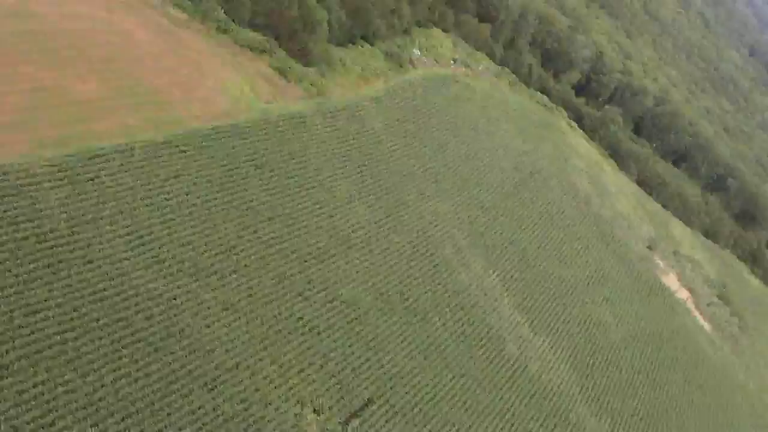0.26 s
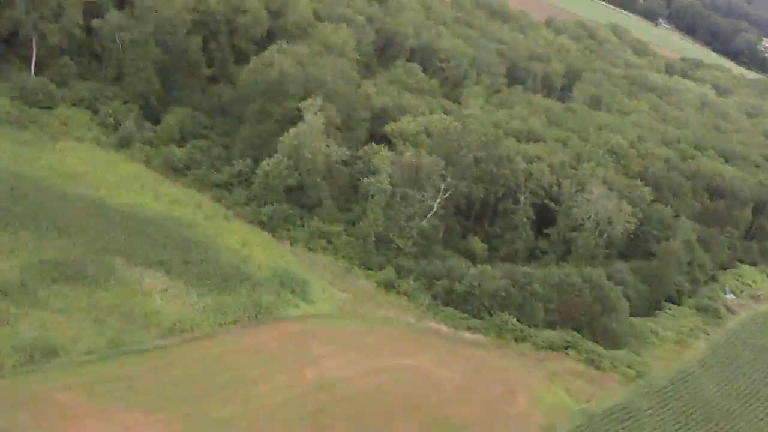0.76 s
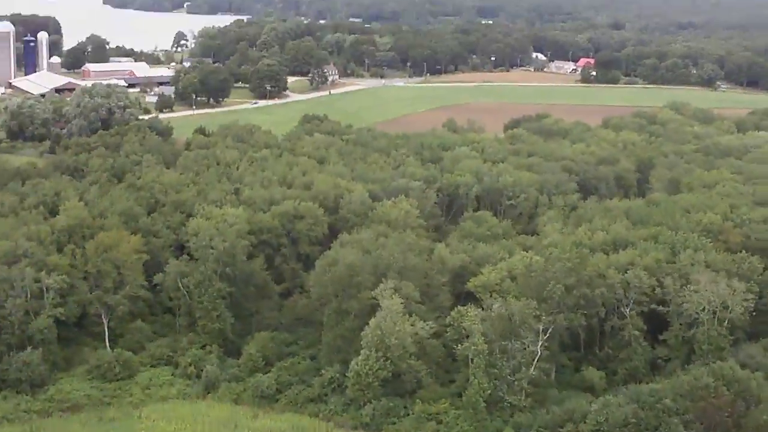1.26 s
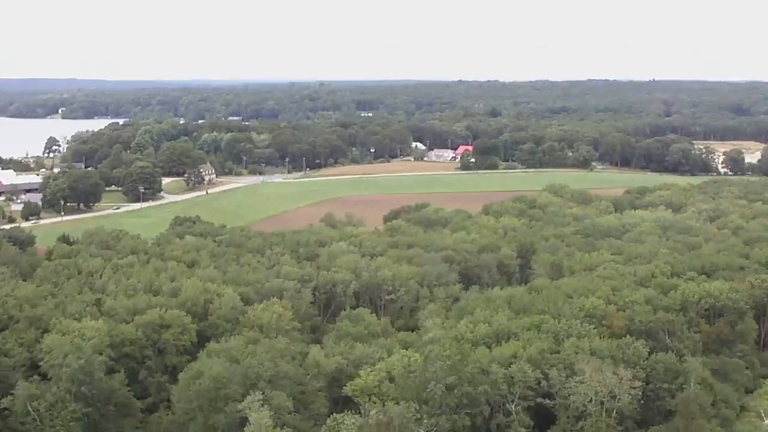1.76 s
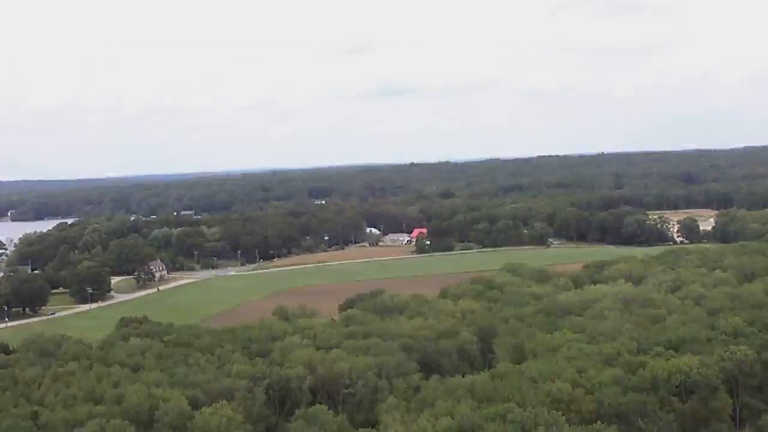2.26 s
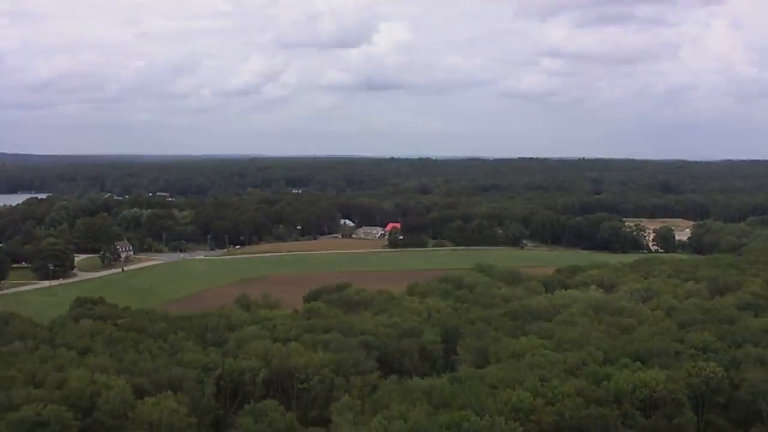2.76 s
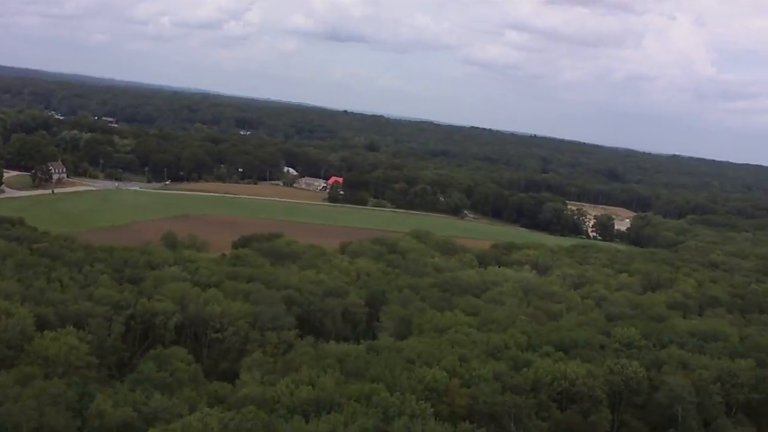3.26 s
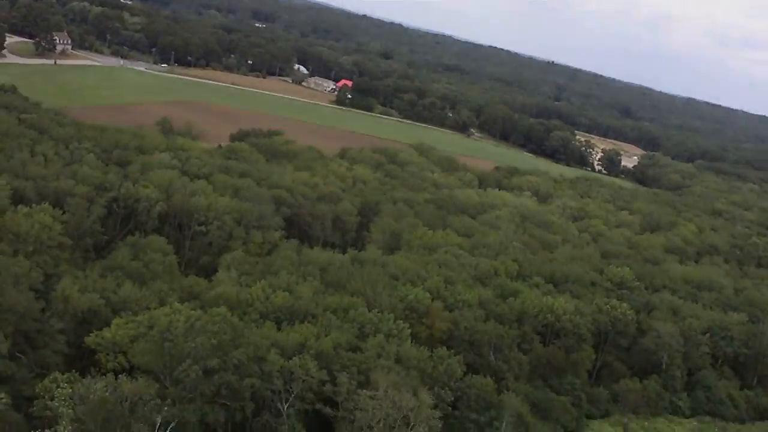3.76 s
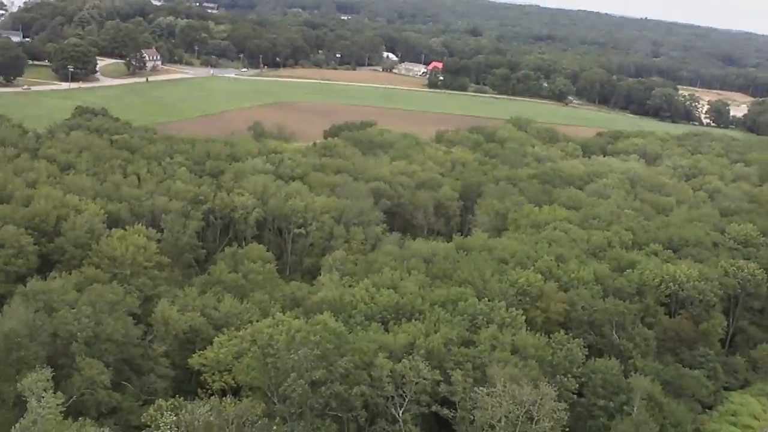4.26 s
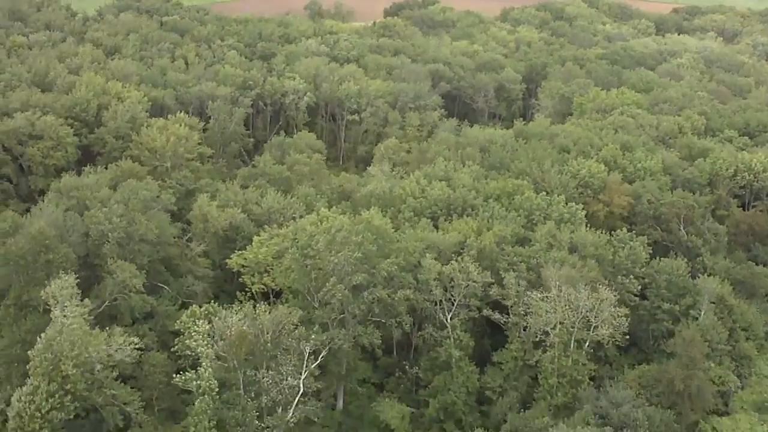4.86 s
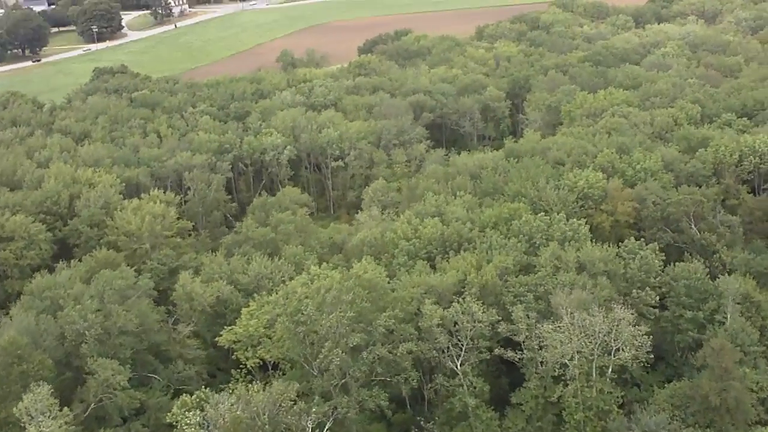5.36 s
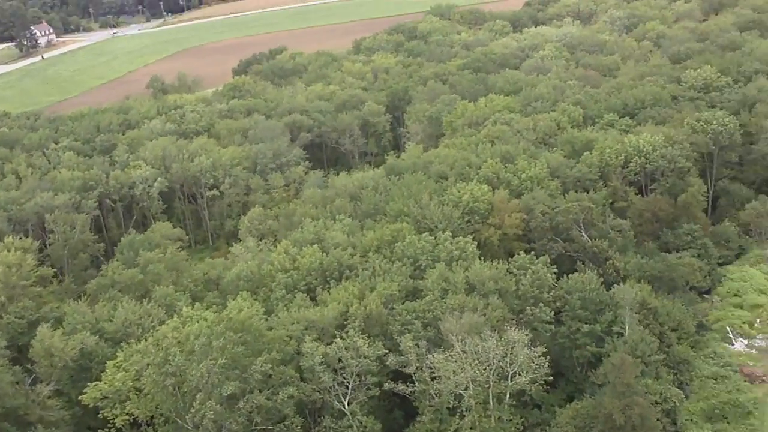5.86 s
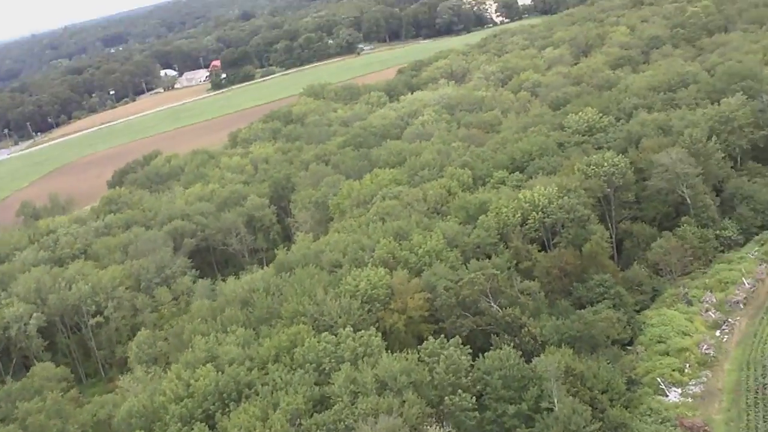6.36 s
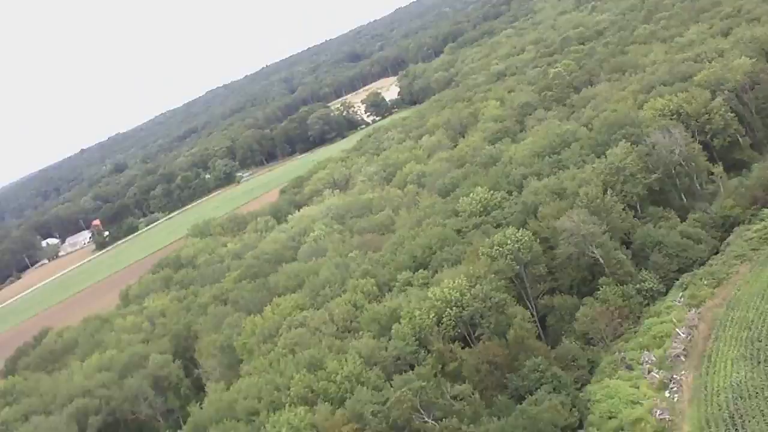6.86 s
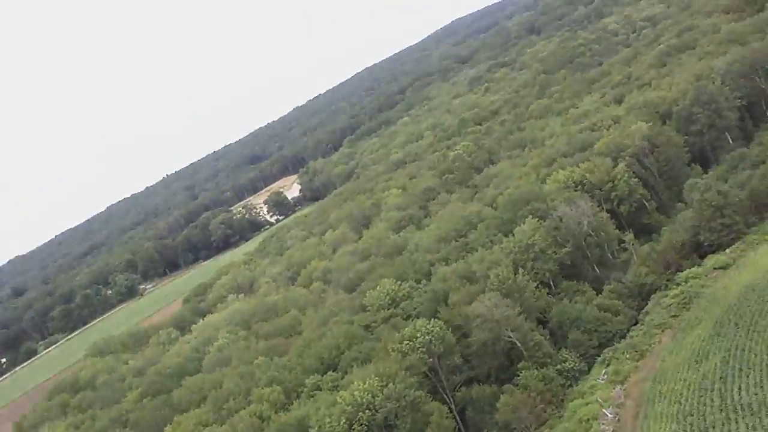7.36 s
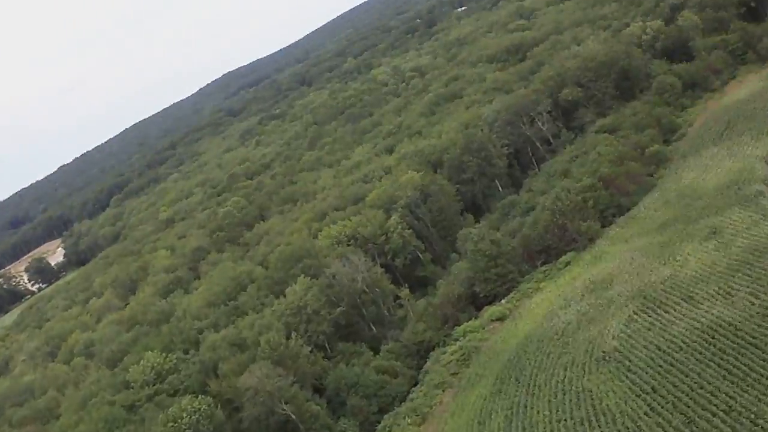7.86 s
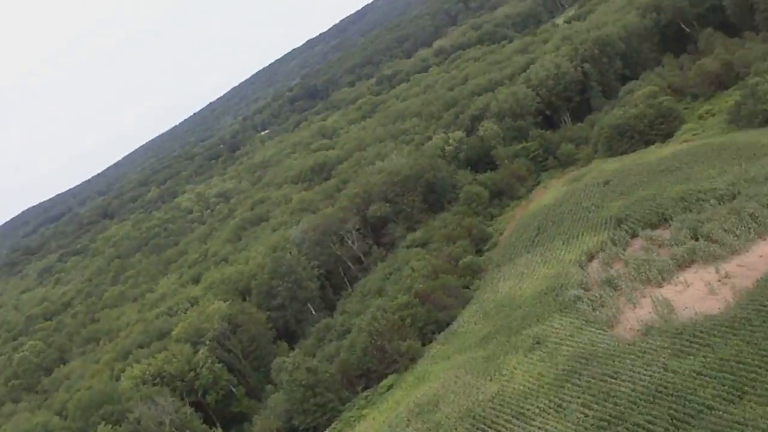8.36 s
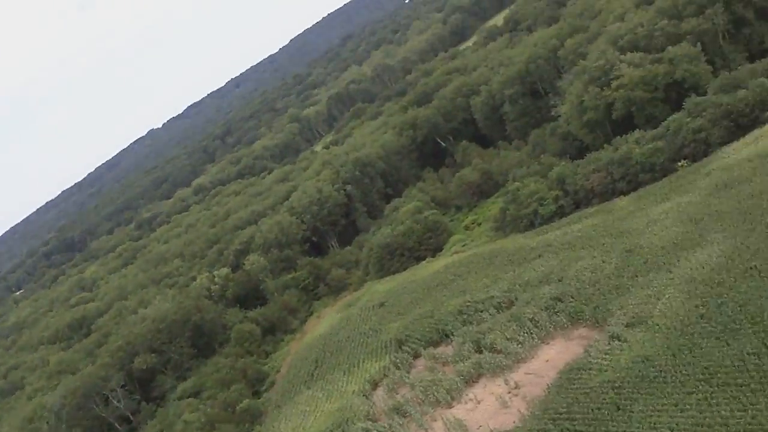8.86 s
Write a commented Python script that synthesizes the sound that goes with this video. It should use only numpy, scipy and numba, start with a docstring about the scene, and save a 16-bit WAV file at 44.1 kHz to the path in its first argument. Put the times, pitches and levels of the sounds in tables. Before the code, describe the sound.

The sound comes from a small microphone mounted on a model airplane flying over fields and woods. From the start, propeller wash hits it as a fast, irregular, low thumping flutter, mixed with rushing wind and scattered harder knocks that spit and overload. The buffeting is strongest and most rumbling around 1.2 to 1.4 seconds, then slows, dulls and is gone by 2 seconds.

From there only the airstream remains, a broad, slightly gusty roar with a hollow tone and a fluttering hiss on top. From about 3 seconds it softens and loses its hiss as the plane glides, reaching its quietest between 4 and 4.6 seconds. It then swells and brightens gradually, and is still rushing at the end, around 9 seconds.

```python
"""A small camera rides on a model airplane over fields. For the first two seconds uneven propeller wash
thumps the microphone about a hundred times a second, stirs up the airstream and overloads the input.
The motor stops and the plane glides: only the airstream is left, roaring in the microphone port.
It fades as the plane slows, then swells from about 4.6 s as the plane banks down."""
import sys
import numpy as np
from scipy import signal
from scipy.fft import rfft, irfft, next_fast_len
from scipy.io import wavfile
from scipy.ndimage import uniform_filter1d
from numba import njit

SR = 44100
rng = np.random.default_rng(int(sys.argv[2]) if len(sys.argv) > 2 else 0)


def int16_out(signal):
    """Quantize to a 16-bit WAV file."""
    q = np.round(np.clip(np.atleast_2d(signal).T, -1, 1) * 32767)
    wavfile.write(sys.argv[1], SR, q.astype(np.int16))


N = 402191


def undb(db):
    return 10 ** (np.asarray(db) / 20)


def curves(table):
    """Columns after t/s, interpolated per sample."""
    times_s, *columns = np.transpose(table)
    return [np.interp(np.arange(N) / SR, times_s, column) for column in columns]


def walk(rate_hz):
    """Random steps, smoothed twice; rms 1."""
    hold = int(SR / rate_hz)
    steps = np.repeat(rng.standard_normal(N // hold + 1), hold)
    smooth = uniform_filter1d(uniform_filter1d(steps, hold), hold)[:N]
    return smooth / np.sqrt(np.mean(smooth ** 2))


def ring(x, hz, width_hz):
    """Two-pole resonance; impulse response peaks near 1."""
    radius, angle = np.exp(-np.pi * width_hz / SR), 2 * np.pi * hz / SR
    return signal.lfilter([np.sin(angle)], [1, -2 * radius * np.cos(angle), radius ** 2], x)


@njit
def pulses(rate_hz, rate_factors, sizes):
    """One pulse per phase wrap; each cycle has its own rate factor and size."""
    out, phase, cycle = np.zeros(len(rate_hz)), 0., 0
    for i in range(len(rate_hz)):
        phase += rate_hz[i] * rate_factors[cycle] / SR
        if phase >= 1:
            phase, cycle = phase - 1, cycle + 1
            out[i] = sizes[cycle]
    return out


# Airframe modes: f/Hz, width/Hz, level/dB
AIRFRAME_MODES = [(113, 77, -2), (260, 350, 2), (407, 91, -9.5)]


def thump(blows, upper_lift_db):
    """Each blow rings the airframe; the microphone rolls off the bass."""
    lowest, *upper = [undb(db) * ring(blows, hz, width_hz) for hz, width_hz, db in AIRFRAME_MODES]
    rung = lowest + undb(upper_lift_db) * sum(upper)
    return signal.sosfilt(signal.butter(2, 80, "high", fs=SR, output="sos"), rung)


# Propeller wash before the motor fade: t/s, thump rate/Hz, level/dB
WASH_TRACK = [(0.0, 129.6, -18.5), (0.2, 116.4, -15.5), (0.41, 112, -17), (0.53, 118.1, -24.5),
              (0.7, 106, -21), (0.9, 118, -15.5), (1.2, 108.1, -6.5), (1.3, 125, -11), (1.37, 140.2, -7.5),
              (1.55, 110, -16), (1.7, 83.9, -15), (1.83, 85.9, -20), (2.0, 82, -19)]
MOTOR_STOP_S, SUCTION_LEAD_S = WASH_TRACK[-1][0], 0.00217


def propeller_wash():
    """One thump per vortex hitting the port; its low-pressure core arrives just ahead of its push."""
    rate_hz, level_db = curves(WASH_TRACK)
    rate_jitter, size_jitter = rng.standard_normal((N // 100, 2)).T
    pushes = pulses(rate_hz, np.exp(0.24 * rate_jitter), undb(5.4 * size_jitter))
    suction = 0.5 * np.roll(pushes, -int(SUCTION_LEAD_S * SR))
    upper_lift_db = 4 - 4 * np.arange(N) / SR  # duller as the motor winds down
    drone = thump(pushes - suction, upper_lift_db)
    drone /= np.std(drone[:int(MOTOR_STOP_S * SR)])
    return drone * undb(level_db) * motor_running()


def motor_running(fade_s=0.21):
    """1 while the motor turns, ramping to 0 as it stops."""
    return np.clip((MOTOR_STOP_S - np.arange(N) / SR) / fade_s, 0, 1)


# Airstream: t/s, port roar level/dB, hiss level/dB, whistle lift/dB
AIR_TRACK = [(0.0, -17.5, -18, 0), (0.2, -18.5, -21.5, 2), (0.65, -17, -17.5, -0.5),
             (0.77, -16.5, -20.5, 1.5), (1.0, -18, -20, -1), (1.34, -21.5, -22, 0.5), (1.39, -27, -28.5, 0),
             (1.43, -23, -27.5, 0), (1.48, -19.5, -22.5, -3), (1.65, -17.5, -16.5, 0), (1.86, -18, -23, 3),
             (2.1, -19.5, -24, -2), (2.4, -19.5, -24, 2.5), (2.85, -18, -24.5, 1.5),
             (3.45, -21.5, -31.5, 0), (3.6, -21, -33, -1), (4.05, -24, -36, -1.5), (4.4, -22, -34, 0),
             (4.62, -23, -39, 0.5), (5.03, -20.5, -28.5, -1.5), (5.5, -20.5, -30, -1.5),
             (6.04, -20.5, -27, 2.5), (6.7, -21, -27.5, -1.5), (6.95, -20.5, -27.5, -1),
             (7.25, -19, -26, 2), (8.1, -18.5, -24.5, 1), (9.12, -18, -22, -1)]
# Rush spectrum, with a narrow coder notch at 6.8 kHz that is not part of the wind: f/Hz, level/dB
RUSH_SPECTRUM = [(15, -34), (25, -11), (86, -3), (130, -5), (450, -6), (1450, -8.5), (1800, -9),
                 (3400, -14.5), (5800, -18), (6500, -22), (6800, -42.5), (6950, -25.5), (7400, -64.5)]
# Hollow resonances of the microphone port: f/Hz, width/Hz, lift/dB
PORT_RESONANCES = [(927, 600, 5), (1770, 310, 1.5), (4840, 630, 2)]


def airstream(spit_db, hiss_from_hz=3040, spit_from_hz=1300, rumble_from_hz=53, rumble_to_hz=370):
    """Port turbulence in half-octave bands: gusts shake all, eddies the treble, each also flickers alone."""
    size = next_fast_len(N)
    hz = np.maximum(np.arange(size // 2 + 1) * SR / size, 1)

    def bell(centre_hz, width_hz):
        return 1 / (1 + (2 * (hz - centre_hz) / width_hz) ** 4)

    def above(f_hz, corner_hz):
        return 1 / (1 + (corner_hz / f_hz) ** 3)

    roar_db, hiss_db, whistle_db = curves(AIR_TRACK)
    _, wash_db = curves(WASH_TRACK)
    rumble_db = 0.79 * np.maximum(wash_db + 26, 0) * motor_running()  # wash over -26 dB stirs the air
    gust_db = (0.42 + 0.5 * motor_running()) * walk(14)
    rush_hz, rush_db = np.transpose(RUSH_SPECTRUM)
    colour_db = np.interp(np.log(hz), np.log(rush_hz), rush_db)
    colour_db += sum(db * bell(centre_hz, width_hz) for centre_hz, width_hz, db in PORT_RESONANCES)
    spectrum = rfft(rng.standard_normal(size)) * undb(colour_db)
    roar_rms = np.std(irfft(spectrum * ((hz > 600) & (hz < 1300)), size))
    hiss_rms = np.std(irfft(spectrum * ((hz > 2500) & (hz < 6500)), size))
    roar_gain_db = roar_db - 20 * np.log10(roar_rms)
    hiss_gain_db = hiss_db - 20 * np.log10(hiss_rms)
    eddies_db = 0.29 * walk(12) + 0.53 * walk(60) + 1.1 * walk(300)
    rush = np.zeros(N)
    for octave in np.arange(4, 13.6, 0.5):
        band_hz = 2 ** octave
        window = np.clip(1 - 2 * np.abs(np.log2(hz) - octave), 0, 1)
        band = irfft(spectrum * window, size)[:N]
        hiss_share = above(band_hz, hiss_from_hz)
        rumble_share = above(band_hz, rumble_from_hz) * (1 - above(band_hz, rumble_to_hz))
        gain_db = (1 - hiss_share) * roar_gain_db + hiss_share * (hiss_gain_db + eddies_db)
        gain_db += rumble_share * rumble_db + above(band_hz, spit_from_hz) * spit_db
        rush += band * undb(gain_db + gust_db + 0.61 * walk(12))
    whistle = irfft(spectrum * bell(centre_hz=850, width_hz=250), size)[:N]
    return rush + whistle * undb(roar_gain_db + gust_db) * (undb(whistle_db) - 1)


def port_spit_db(pressure, depth_db=7, knee_per_s=700):
    """Treble gain: rising pressure forces air into the port and spits; falling pressure chokes it."""
    slope_per_s = uniform_filter1d(np.gradient(pressure), 30) * SR
    return depth_db * np.tanh(slope_per_s / knee_per_s)


# Hardest vortex blows: t/s, push level/dB, suction/push ratio
HARD_BLOWS = [(.059, -6, 0.8), (.135, -7, .8), (0.203, -3, 0.5), (0.276, 3.5, 1), (0.427, -2, 1),
              (.555, 0, 0.65), (.728, -1, 0.72), (.738, -2, 0.6), (0.749, 4.5, 0.5), (0.776, 1.5, 0.45),
              (.844, -2, 0.3), (.854, -1.5, 0.4), (.937, -3, .2), (.990, -2.5, 0.2), (.999, -2, .3),
              (1.141, 0, .3), (1.179, -12, .1), (1.206, -13, .3), (1.225, 0, 0.36), (1.253, -2, 0.2),
              (1.337, -1.5, 0.09), (1.359, -2, 0.28), (1.388, 3, .3), (1.469, -1.5, 0.02), (1.608, 1, 0.7),
              (1.660, 0, 0.3), (1.682, 1, 0.19), (1.706, 1, 0.09)]


def hard_thumps():
    """Strongest vortices: suction, then push. These stay sharp as the motor winds down."""
    blows = np.zeros(N)
    for time_s, push_db, suction_ratio in HARD_BLOWS:
        blows[int(time_s * SR)] = undb(push_db)
        blows[int((time_s - SUCTION_LEAD_S) * SR)] = -suction_ratio * undb(push_db)
    return thump(blows, upper_lift_db=3.5)


def scene():
    """Thumps plus the airstream whose treble they modulate; mono."""
    thumps = propeller_wash() + hard_thumps()
    return (thumps + airstream(port_spit_db(thumps)))[None]


@njit
def follow(x, attack_s, release_s):
    """Envelope follower of the gain control."""
    out, level = np.empty(len(x)), 0.
    for i in range(len(x)):
        level += (x[i] - level) / (SR * (attack_s if x[i] > level else release_s))
        out[i] = level
    return out


def record(dry, threshold=0.5, treble_cut_hz=7400, top_cut_hz=15800):
    """Fast gain control, converter clipping, treble cut; the overshoot clips again and is low-passed."""
    envelope = follow(np.abs(dry[0]), attack_s=0.0036, release_s=0.054)
    gain = np.minimum(1, threshold / (envelope + 1e-9)) ** 0.48
    clipped = np.clip(dry * gain, -0.96, 0.96)
    dulled = signal.sosfilt(signal.ellip(10, 0.2, 80, treble_cut_hz, fs=SR, output="sos"), clipped)
    reclipped = np.clip(dulled, -1, 1)
    return signal.sosfilt(signal.ellip(8, 0.2, 70, top_cut_hz, fs=SR, output="sos"), reclipped)


dry = scene()
out = record(dry)
int16_out(out)
```